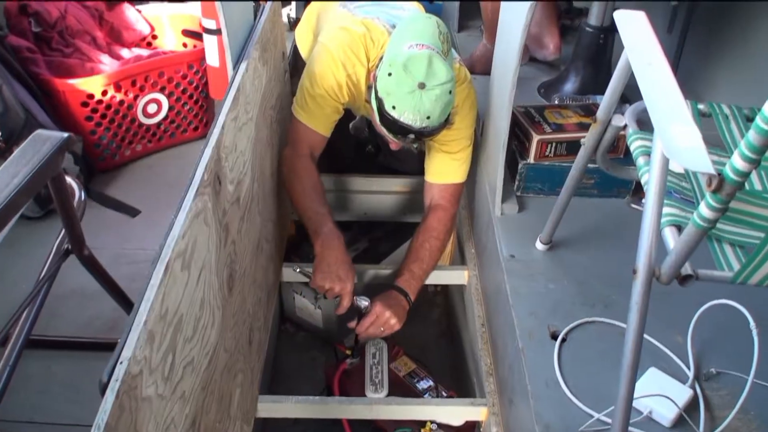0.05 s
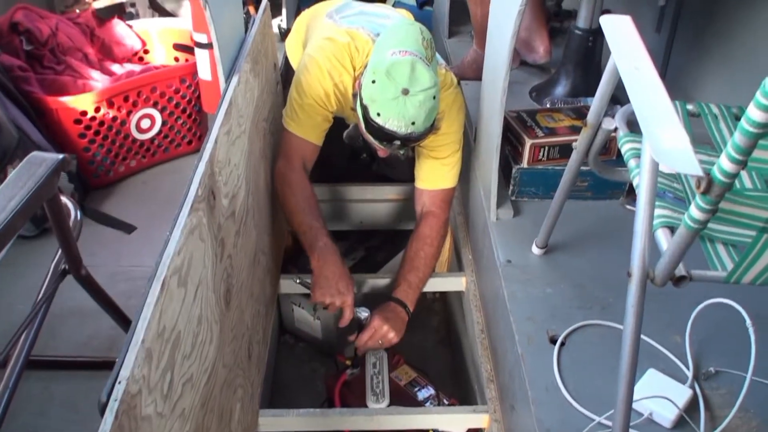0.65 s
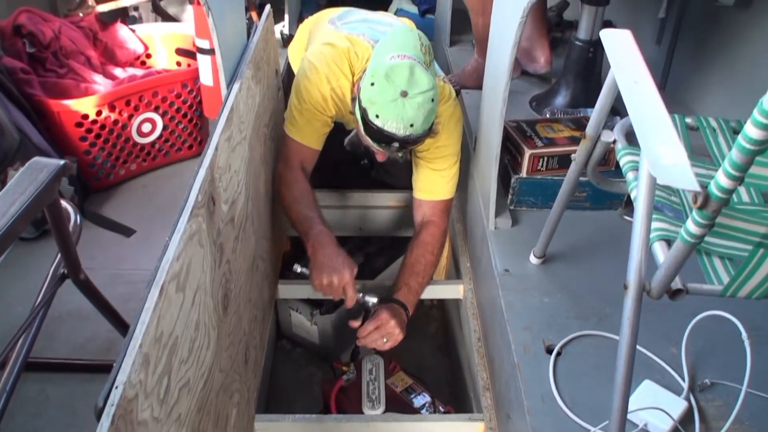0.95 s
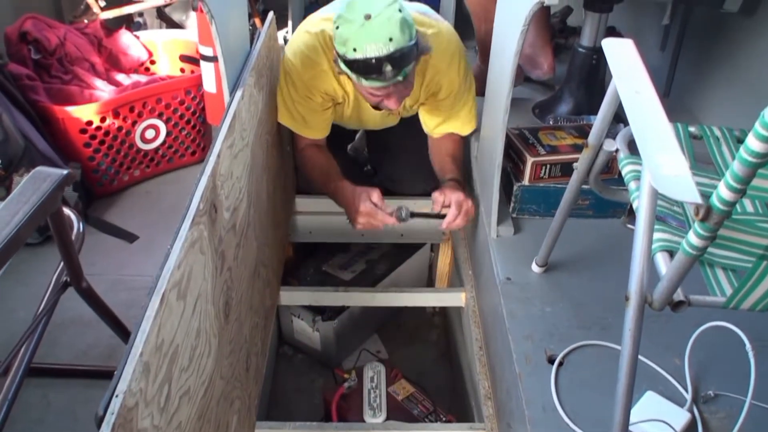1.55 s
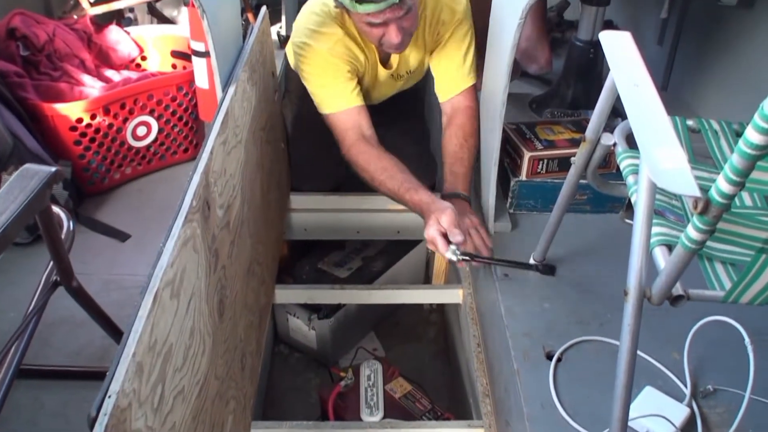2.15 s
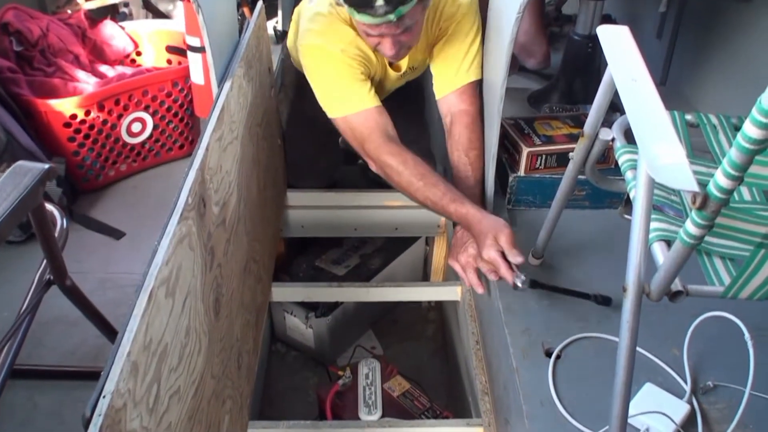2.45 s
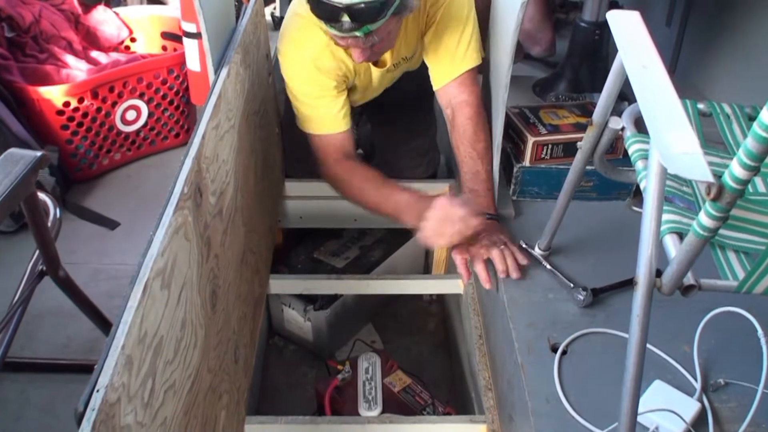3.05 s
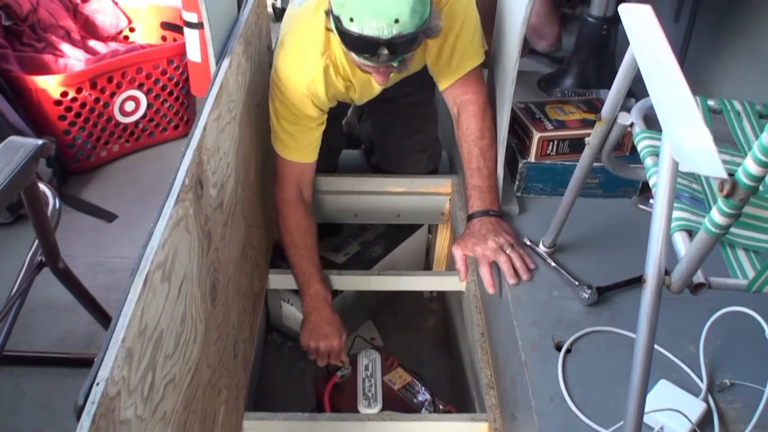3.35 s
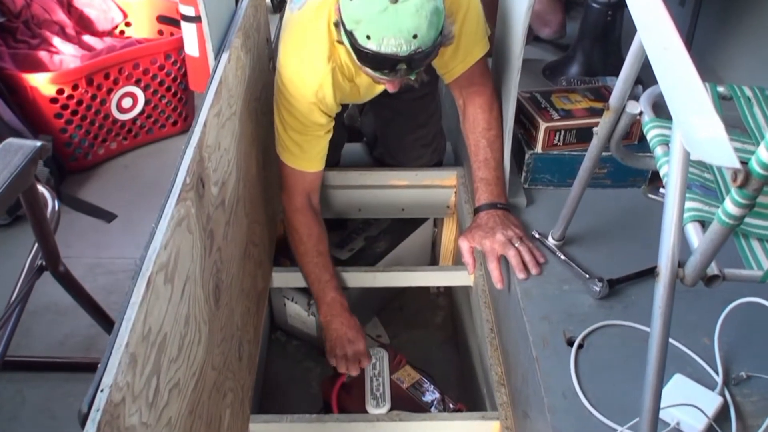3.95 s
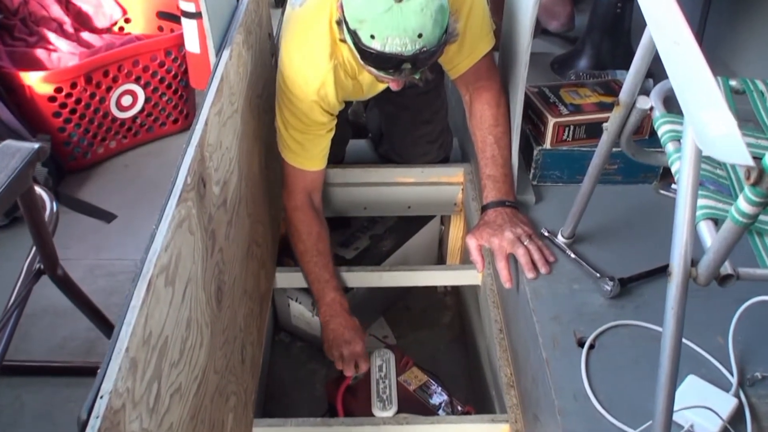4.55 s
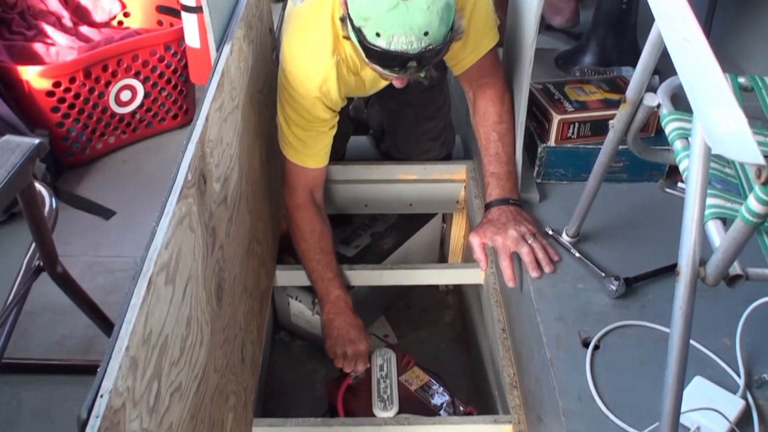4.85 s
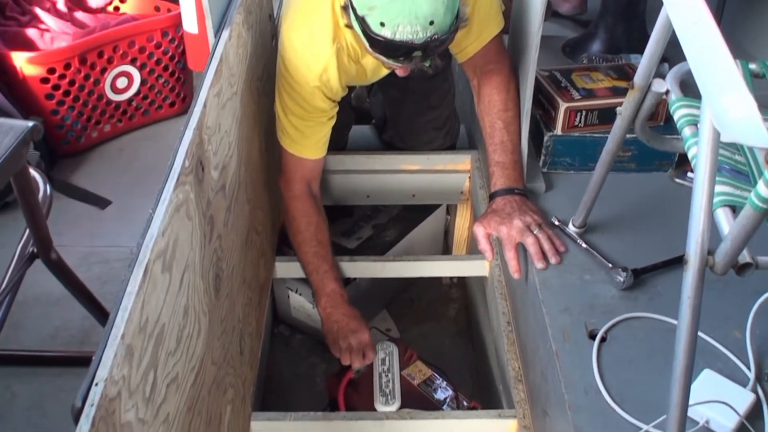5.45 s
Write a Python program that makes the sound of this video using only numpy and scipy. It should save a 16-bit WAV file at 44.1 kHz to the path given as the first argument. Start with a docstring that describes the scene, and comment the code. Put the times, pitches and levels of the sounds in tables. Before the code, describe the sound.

A wrench squeaks on a nut, clinks and knocks onto a boat deck, then small metal parts tick over a low hum.

```python
"""Undoing a battery lead in the bilge

Close up in a small boat, in stereo. Steel scrapes and squeaks on the terminal nut, the wrench clinks
and is laid on the deck with a few knocks, then fingers tick and rub at the clamp. The close walls
smear every hit. Behind it are a far engine's hum, a faint high whistle and a low outdoor rumble."""
import sys
import numpy as np
from scipy import signal
from scipy.fft import rfft, irfft
from scipy.io import wavfile
from scipy.ndimage import uniform_filter1d

SR = 44100
rng = np.random.default_rng(int(sys.argv[2]) if len(sys.argv) > 2 else 0)


def unload_audio(sound):
    """Save the sound as a 16-bit wav file, at the path given as the first command line argument."""
    columns = np.transpose(np.atleast_2d(sound))
    # keep every value between -1 and 1, then stretch to whole-number steps
    steps = np.round(np.clip(columns, -1, 1) * 32767)
    wavfile.write(sys.argv[1], SR, steps.astype(np.int16))


N = 247401
HZ = np.fft.rfftfreq(8192, 1 / SR)  # the frequencies of every gain curve

# broad colour of the battery clamp: frequency_hz, level_db
CLAMP_COLOUR = [(200, -15), (700, -0.5), (1600, 0), (2700, -1), (5000, -1), (9000, -2.5), (15000, -10)]
# its resonances: pitch_hz, width_hz, lift_db
CLAMP_RESONANCES = [(2330, 99, 3.2), (3020, 130, 3.8)]


def scrapes():
    """Steel rasps over the nut as each pull swells and eases; where it catches, one mode sings."""
    nut_colour = [(150, -22), (1000, -13.5), (2200, -12), (3200, -12), (6000, -8), (8300, -5), (9700, -1.5),
                  (11200, -2.5), (12900, -15), (14500, -3), (16000, -10)]  # frequency_hz, level_db
    nut_modes = [(3900, 83, 9.1), (4160, 60, 11.4), (7180, 120, 13.4), (9680, 77, 4.3), (10980, 120, 13),
                 (14400, 200, 6), (14920, 120, 7)]  # pitch_hz, width_hz, lift_db
    pulls = [(0.001, 15, 0.0079), (0.019, 4.5, 0.016), (0.049, 8.5, 0.0083), (0.517, 17, 0.081),
             (0.611, 17.5, .078), (0.73, 5, 0.0072)]  # start_s, strength_db, length_s
    squeaks = [(0.049, 23, 0.0106, 7030), (0.531, 23.5, 0.039, 6970), (0.534, 20.5, 0.026, 10900),
               (0.62, 17, 0.018, 9760), (0.63, 10, 0.01, 10500), (0.673, 21, 0.03, 7040),
               (0.727, 20, .009, 9700)]  # start_s, strength_db, length_s, pitch_hz
    grip, squeak_width_hz = 0.61, 350  # grip: force at the ends of a pull, as a share of its peak
    out, nut = np.zeros((2, N)), body(nut_colour, nut_modes)
    for s, db, length in pulls:
        progress = np.linspace(0, 1, int(length * SR))
        force = np.interp(progress, [0, 0.7, 1], [grip, 1, grip])
        rasp = contacts(force, per_s=3000, spread_db=2.0)
        add(out, s, amp(db) * excite(rasp, nut, direct_db=-5.5))
    for s, db, length, hz in squeaks:
        force = signal.windows.tukey(int(length * SR), .3)
        catches = contacts(force, per_s=2100, spread_db=1.5)
        singing_mode = nut * np.sqrt(peaks([(hz, squeak_width_hz, 0)]))
        add(out, s, amp(db) * excite(catches, singing_mode, direct_db=-8.5))
    return out


def clinks():
    """The wrench strikes metal: a bright crash of short modes."""
    hits = [(1.892, 9, 453, 0.5), (2.686, 2.5, 4100, -2.5), (2.738, 18, 353, -1.5),
            (2.761, 11.5, 590, -2.5), (2.936, 4, 300, -7)]  # start_s, strength_db, low_edge_hz, tilt_db_per_octave
    wrench_colour = [(200, -11), (1400, -0.5), (3500, -5), (5500, -1.5), (8500, -2), (11500, -3),
                     (13300, -17), (15500, -11)]  # frequency_hz, level_db
    wrench_modes = [(1430, 28, 2.1), (2710, 107, 3.7), (4190, 110, 5.4), (4487, 51, 4.5), (4820, 72, 5.9),
                    (5260, 62, 8), (6150, 97, 3.2), (7250, 150, 8.4), (9980, 83, 3.8)]  # pitch_hz, width_hz, lift_db
    out, wrench = np.zeros((2, N)), body(wrench_colour, wrench_modes)
    for s, db, low_hz, tilt_db in hits:
        chatter_s = 0.0034 * amp(0.32 * db)  # harder hits chatter longer
        tilt = amp(tilt_db * np.log2((HZ + 1) / 6000))
        gain = wrench * above(low_hz, order=3) * tilt
        add(out, s, amp(db) * excite(blow(chatter_s), gain, direct_db=-13))
    return out * lean_left(0.5)


def knocks():
    """Soft blows on the deck are dull and settle slowly; heavy ones rap and set the boards booming."""
    hits = [(0.001, 24, 264, -8), (0.036, 9.5, 200, 15.5), (0.318, 3.5, 1410, 16), (0.427, 0.5, 940, 16),
            (0.976, 2.5, 900, 8), (1.255, 0.5, 1080, 5), (1.359, -0.5, 1195, 0), (1.995, 1.5, 900, -9),
            (2.609, 28, 1335, -5), (2.744, 20.5, 1440, 4), (2.808, 28, 1650, -7), (2.936, 33, 614, 2.5),
            (2.967, 32, 583, 9.5)]  # start_s, strength_db, high_edge_hz, relative_boom_db
    deck_colour = [(40, -20), (120, -15), (190, -9.5), (320, -1.5), (750, -5), (1400, -2.5), (3000, -2.5),
                   (9000, 31)]  # frequency_hz, level_db
    deck_modes = [(230, 10.6, 14.2), (300, 23, 3), (326, 19, 6.8), (560.4, 28, 10.3), (706, 24, 8),
                  (836, 35.6, 4.1), (903, 40, 4.2), (1173, 16, 4.4), (1527, 75, 3)]  # pitch_hz, width_hz, lift_db
    boom_modes = [(105.7, 7.2, 10.5), (138.3, 3.8, 1)]  # pitch_hz, width_hz, lift_db
    out, deck = np.zeros((2, N)), body(deck_colour, deck_modes)
    boom_gain = np.sqrt(peaks(boom_modes)) * above(63, order=2) * below(165, order=3)
    boom = ring(np.ones(1), boom_gain)
    boom_pair = np.array([boom, np.roll(boom, SR // 2000)]) * lean_left(0.6)  # left side first
    for s, db, high_hz, boom_db in hits:
        chatter_s = 5.6 / high_hz * amp(-0.51 * db)  # 5.6 cycles of the high edge at 0 dB
        rap = amp(db - 45) * below(2130, order=4)  # its share grows with the force
        wood = deck * np.hypot(below(high_hz, order=4), rap)
        add(out, s, amp(db) * excite(blow(chatter_s), wood, direct_db=-10.5) * lean_left(0.5))
        add(out, s, amp(db + boom_db) * boom_pair)
    return out


def tick(chatter_s, hz):
    """A small held part adds a damped mode to the clamp's; small parts are bright, slow touches dead."""
    lift_db = 11.5 - 503 * chatter_s
    part_mode = (hz, hz / 10, lift_db)
    gain = body(CLAMP_COLOUR, CLAMP_RESONANCES + [part_mode]) * below(2.13 * hz, order=2)
    return excite(blow(chatter_s), gain, direct_db=-3.5)


def ticks():
    """Clamp and nut touch: clear ticks, and faint ones at loose intervals while the fingers search."""
    touches = [(0.234, -17.5, 0.0034, 4230), (0.293, -10, 0.0085, 3200), (1.058, -14.5, 0.0048, 6240),
               (2.548, -2, 0.021, 4270), (2.976, -1, 0.013, 4900), (3.517, -10, .002, 4160),
               (3.583, -17.5, .0003, 6240), (3.621, -13.5, 0.0014, 2600), (3.692, -19.5, .0003, 7460),
               (3.953, -17, 0.0052, 3200), (3.977, -7, 0.0062, 3040), (4.204, -3, 0.0019, 3000),
               (4.347, -20, 0.0032, 4000), (4.467, -21, 0.0035, 2900), (4.840, -3, 0.003, 2950),
               (5.018, -9, 0.0085, 2210), (5.323, -3, .0043, 4230), (5.502, 0.5, 0.0053, 2200)]  # start_s, strength_db, chatter_s, pitch_hz
    search_span_s, gap_s = (3.2, 4.7), 0.25
    out = np.zeros((2, N))
    for s, db, chatter_s, hz in touches:
        add(out, s, amp(db) * tick(chatter_s, hz))
    for s in np.arange(*search_span_s, gap_s):
        timing, force, pitch = rng.uniform(-1, 1, 3)
        fidget = amp(-22 + 4 * force) * tick(chatter_s=0.0047, hz=3130 * 1.3 ** pitch)
        add(out, s + .5 * timing * gap_s, fidget)
    return out


def brushes():
    """The lead and its clamp slide along the boards: contacts swell and fade, and hardly ring."""
    slides = [(0.83, -9.5, 0.066), (2.207, -5.5, 0.078), (2.353, -12.5, .06), (2.419, -15.5, 0.094),
              (2.792, 0.5, 0.037), (2.859, -4.5, 0.093), (3.02, -9.5, .17), (3.76, -18.5, 0.048)]  # start_s, strength_db, length_s
    out = np.zeros((2, N))
    gain = body(CLAMP_COLOUR, CLAMP_RESONANCES) * below(11600, order=2)
    for s, db, length in slides:
        friction = contacts(np.hanning(int(length * SR)), per_s=2400, spread_db=2.5)
        add(out, s, amp(db) * excite(friction, gain, direct_db=-5))
    return out


def rubbing():
    """Gritty friction comes in clumps as the fingers twist the clamp loose."""
    effort = [(5.10, -53), (5.17, -40), (5.225, -42), (5.34, -35), (5.435, -40), (5.465, -35.5),
              (5.53, -35), (5.61, -40)]  # time_s, level_db
    rub_colour = [(150, -12), (400, -12), (850, -5.5), (1600, -2.5), (2700, -1), (5000, -3), (8000, -7),
                  (11200, -11), (15800, -24)]  # frequency_hz, level_db
    t = np.arange(N) / SR
    level_db, = follow(effort)
    grit = contacts(amp(2.3 * drift(80)), per_s=2000, spread_db=4.0)
    friction = unit(ring(grit, amp(read(rub_colour, HZ))))[:N]
    rub = friction * amp(level_db) * (t > effort[0][0])
    turn = 2 * np.pi * 3 * t  # the moving hand shifts between two sets of reflections
    shares = np.cos(turn) ** 2, np.sin(turn) ** 2
    return sum(cabin(rub * share, direct_db=0)[:, :N] for share in shares)


def sways():
    """The hull throbs a few times: twice as a body shifts its weight, and once under the heaviest knock on the
    deck."""
    pushes = [(0.265, -34.5, 0.072), (0.403, -34.5, 0.066), (2.931, -34, 0.062)]  # start_s, level_db, half_length_s
    out, hull_hz = np.zeros((2, N)), 43
    for s, db, half_length in pushes:
        t = np.arange(int(2 * half_length * SR)) / SR
        throb = np.hanning(len(t)) * np.sin(2 * np.pi * hull_hz * t)
        add(out, s, amp(db) * throb[None])
    return out


def engine():
    """A far engine: one low hum that creeps up in pitch and wavers, with a weak octave."""
    loudness = [(0, -50), (0.6, -44.5), (1.4, -46), (2.2, -41), (3.4, -43), (3.9, -55), (5.61, -53.5)]  # time_s, level_db
    start_hz, climb_hz_per_s = 107, 3.3
    db, = follow(loudness)
    hz = (start_hz + climb_hz_per_s * np.arange(N) / SR) * (1 + 0.0052 * drift(5.4))
    phase = 2 * np.pi * np.cumsum(hz) / SR + np.array([[0], [.3]])  # reaches the right side first
    hum = np.sqrt(2) * (np.sin(phase) + amp(-15.5) * np.sin(2 * phase))
    return amp(db + 1.2 * drift(7.9)) * hum * lean_left(0.6)


def whistle():
    """A thin, broken whistle and a fainter overtone glide inside a high hiss."""
    glide = [(0.8, 9000, -85), (0.94, 9560, -68), (1.15, 8620, -67.5), (1.45, 11260, -61),
             (1.52, 11300, -64), (1.63, 13000, -58), (1.8, 10650, -69)]  # time_s, pitch_hz, level_db
    t = np.arange(N) / SR
    hz, db = follow(glide)
    phase = 2 * np.pi * np.cumsum(hz * (1 + 0.011 * drift(14.7))) / SR
    tones = sum(amp(lift_db + 4.7 * drift(13)) * drift(220) * np.sin(ratio * phase)
                for ratio, lift_db in [(1, 0.5), (1.2, -4.5)])
    hiss = amp(3.5) * drift(2900) * np.sin(2 * np.pi * 12800 * t)
    sounding = (t > glide[0][0]) * (t < glide[-1][0])
    return cabin((tones + hiss) * amp(db) * sounding, direct_db=-3)[:, :N]


def air():
    """Low outdoor rumble and faint hiss, swelling a little."""
    colour = [(20, -7), (42, -3), (68, -10), (102, 0.4), (155, -12), (228, -6), (388, -16), (1120, -21),
              (2000, -27), (7300, -37), (10000, -41), (14000, -43), (16000, -50)]  # frequency_hz, relative_level_db
    likeness = [(30, 0.4), (100, 1), (300, 0.48), (640, 0.035), (2500, 0.034), (8000, 0.3), (15000, 0.51)]  # frequency_hz, left_right_correlation
    wash = noise_pair(likeness, lambda hz, t: read(colour, hz)[:, None], count=N, size=4096)
    level_db = -44 + 1.2 * drift(3)
    return amp(level_db) * unit(wash)


def cabin(x, direct_db):
    """At the microphone: direct sound, dense reflections off close walls and a faint, dull late tail."""
    decay = [(150, 0.19), (500, 0.17), (1500, 0.13), (6000, 0.13), (14000, 0.12)]  # frequency_hz, t60_s
    likeness = [(100, 0.4), (300, 0.088), (1400, 0.013), (4000, 0.44), (14000, 0.14)]  # frequency_hz, left_right_correlation

    def decay_db(hz, t):
        early = amp(-60 * t / read(decay, hz)[:, None])
        late = amp(-40 - 60 * t) / (1 + (hz[:, None] / 5000) ** 4)
        return 20 * np.log10(early + late)
    response = noise_pair(likeness, decay_db, count=18000, size=256)  # new reflections for each sound
    response *= 1 - np.exp(-np.arange(response.shape[1]) / (0.00029 * SR))
    response /= np.linalg.norm(response, axis=1, keepdims=True)
    response[:, 0] += amp(direct_db)
    return signal.fftconvolve(x[None], response / np.linalg.norm(response[0]), axes=1)


def contacts(envelope, per_s, spread_db):
    """Tiny impacts of uneven size under an envelope, of total energy 1."""
    count = len(envelope)
    sign = np.sign(rng.standard_normal(count))
    hit = rng.random(count) < per_s / SR
    hit[0] = True
    size = amp(-spread_db * np.log(rng.random(count) + 0.015))
    train = sign * hit * envelope * size
    return train / (np.linalg.norm(train) + 1e-12)


def blow(chatter_s):
    """Surfaces bed in, then chatter as they settle; a quick hit starts hard, a slow one swells."""
    age = np.arange(SR // 6) / (SR * max(chatter_s, 1e-4))
    bite = .5 * np.exp(-chatter_s / 0.02)
    return contacts((age + bite) * np.exp(-1.5 * age), per_s=2400, spread_db=1.5)


def excite(force, gain, direct_db):
    """A force rings an object in the cabin; its spectrum is evened out so the object sets the colour."""
    pair = cabin(force, direct_db)
    power = uniform_filter1d(abs(rfft(pair, 32768)) ** 2, size=260, axis=1)[:, ::4]
    return np.array([ring(x, gain / np.sqrt(p + 1e-6)) for x, p in zip(pair, power)])


def body(colour, modes):
    """Gain of an object: a broad colour with resonances standing out of it."""
    return amp(read(colour, HZ)) * np.sqrt(1 + peaks(modes))


def peaks(modes):
    """Power gain of a set of resonances."""
    return sum(amp(db) ** 2 / (1 + (2 * (HZ - hz) / width) ** 2) for hz, width, db in modes)


def ring(x, gain):
    """Passes x through the minimum-phase filter that has this gain."""
    log_gain = np.log(np.maximum(gain, 1e-5))
    mirrored = np.r_[log_gain, log_gain[-2:0:-1]]
    taps = np.fft.ifft(np.exp(np.conj(signal.hilbert(mirrored)))).real
    fade = np.minimum(np.linspace(2, 0, len(HZ)), 1)  # the ring dies out without a click
    return signal.fftconvolve(x, taps[:len(HZ)] * fade)


def noise_pair(likeness, field_db, count, size):
    """Partly alike left and right noises, shaped by field_db(hz, seconds)."""
    frames = dict(nperseg=size, noverlap=size * 3 // 4)
    hz, t, (a, b) = signal.stft(rng.standard_normal((2, count)), SR, **frames)
    correlation = read(likeness, hz)[:, None]
    mid, side = a * np.sqrt((1 + correlation) / 2), b * np.sqrt((1 - correlation) / 2)
    spectra = np.array([mid + side, mid - side]) * amp(field_db(hz, t))
    return signal.istft(spectra, SR, **frames)[1][:, :count]


def drift(rate_hz):
    """A random wander of rms 1 that rolls off above rate_hz."""
    smoothing = np.exp(-(np.fft.rfftfreq(N, 1 / SR) / rate_hz) ** 2)
    return unit(irfft(rfft(rng.standard_normal(N)) * smoothing, N))


def below(edge_hz, order):
    """Gain of a low-pass."""
    return 1 / np.sqrt(1 + (HZ / edge_hz) ** (2 * order))


def above(edge_hz, order):
    """Gain of a high-pass."""
    return np.sqrt(1 - below(edge_hz, order) ** 2)


def read(points, hz):
    """A curve's value at hz, on a log frequency axis."""
    point_hz, value = np.transpose(points)
    return np.interp(np.log(hz + 1), np.log(point_hz + 1), value)


def follow(rows):
    """The columns of a timed table at every sample."""
    s, *columns = np.transpose(rows)
    return [np.interp(np.arange(N) / SR, s, column) for column in columns]


def add(mix, start_s, sound):
    """Mixes a sound in at start_s."""
    part = mix[:, round(start_s * SR):][:, :sound.shape[1]]
    part += sound[:, :part.shape[1]]


def lean_left(db):
    """Gains that raise the left side and lower the right by db."""
    return amp([[db], [-db]])


def amp(db):
    """Decibels to amplitude."""
    return 10 ** (np.asarray(db) / 20)


def unit(x):
    """Scales x to rms 1."""
    return x / np.sqrt(np.mean(x ** 2) + 1e-20)


def scene():
    """The close work on the battery over the boat's background."""
    work = scrapes() + clinks() + knocks() + sways() + ticks() + brushes() + rubbing()
    return work + engine() + whistle() + air()


def record(dry):
    """The microphone's band limit."""
    low_pass = signal.firwin(511, cutoff=15850, window=("kaiser", 9), fs=SR)
    return signal.oaconvolve(dry, low_pass[None], "same")


dry = scene()
out = record(dry)
unload_audio(out)
```